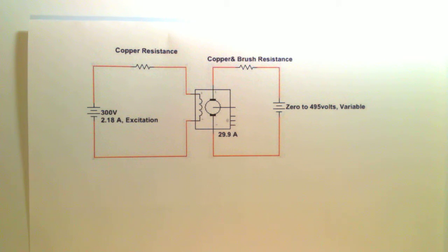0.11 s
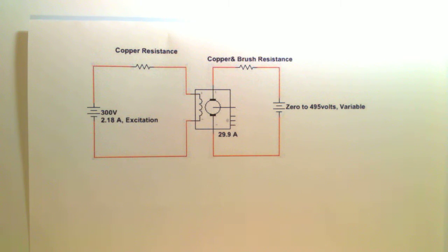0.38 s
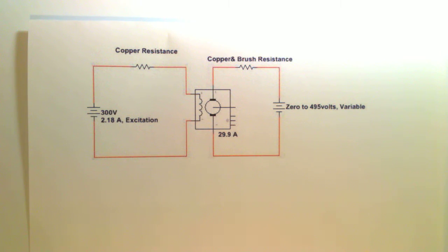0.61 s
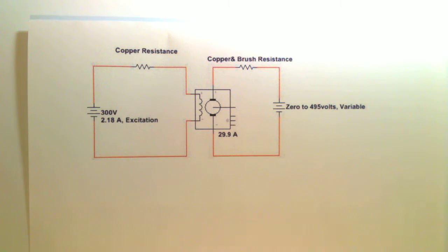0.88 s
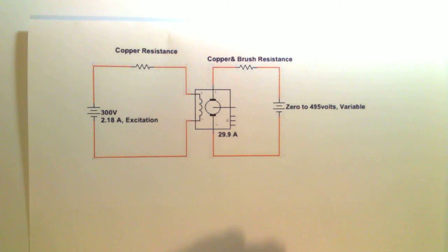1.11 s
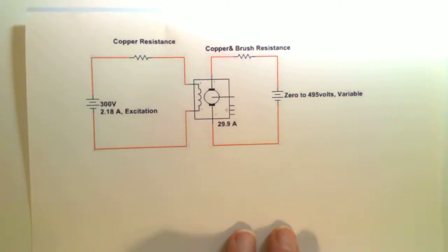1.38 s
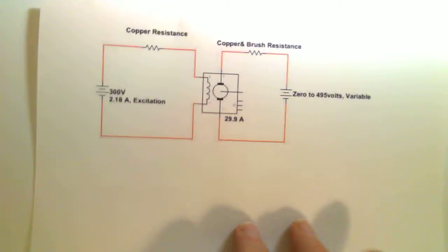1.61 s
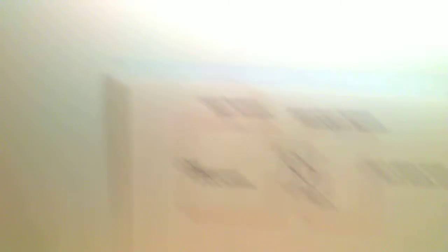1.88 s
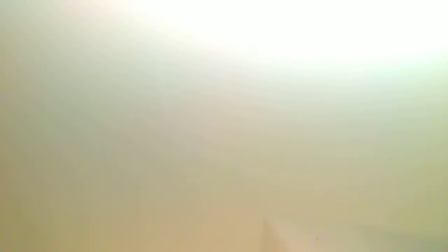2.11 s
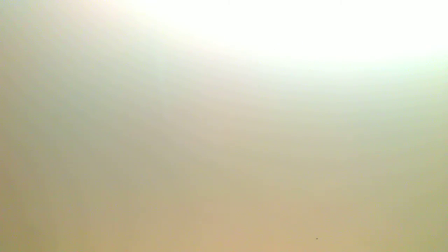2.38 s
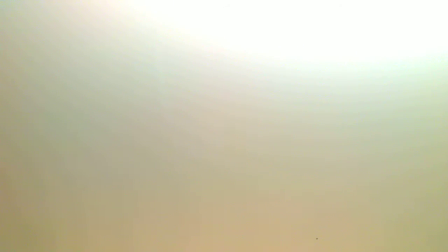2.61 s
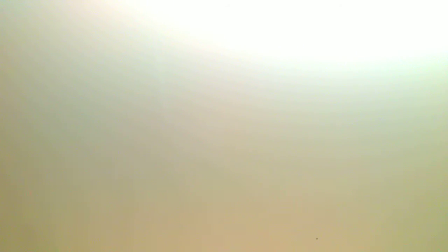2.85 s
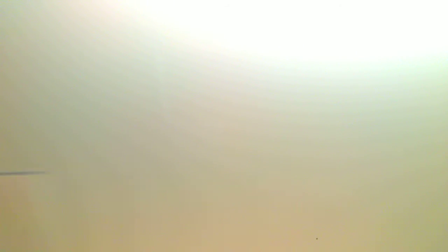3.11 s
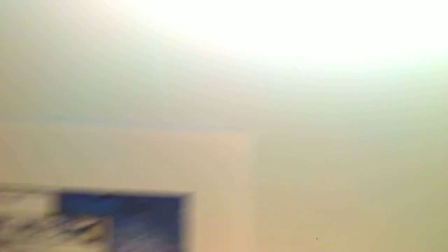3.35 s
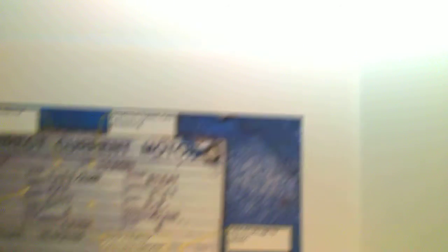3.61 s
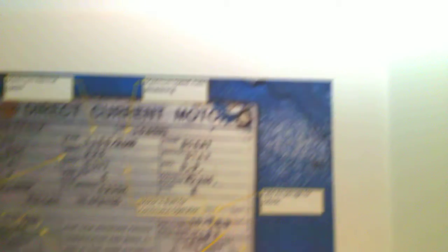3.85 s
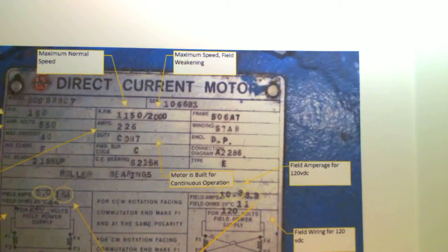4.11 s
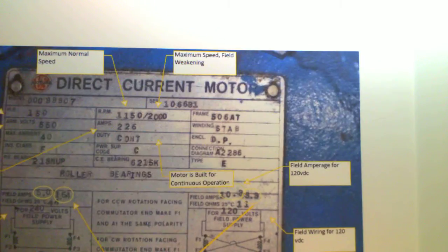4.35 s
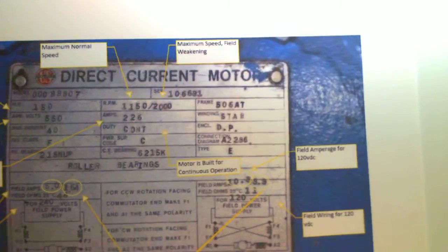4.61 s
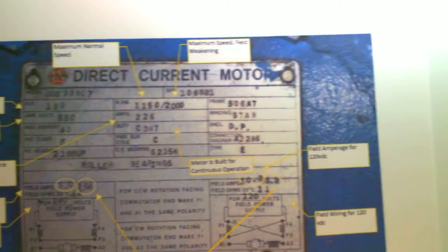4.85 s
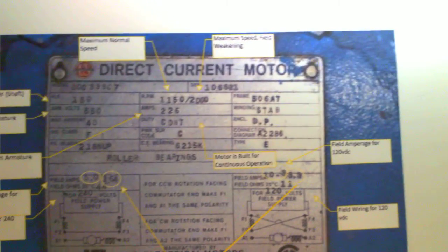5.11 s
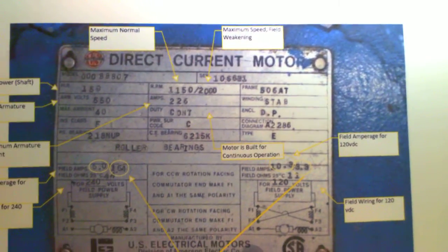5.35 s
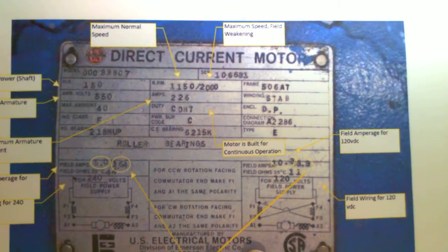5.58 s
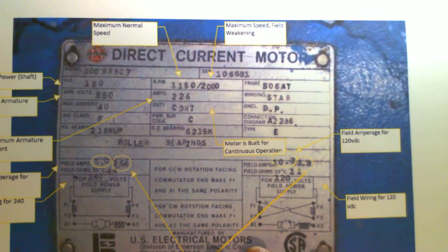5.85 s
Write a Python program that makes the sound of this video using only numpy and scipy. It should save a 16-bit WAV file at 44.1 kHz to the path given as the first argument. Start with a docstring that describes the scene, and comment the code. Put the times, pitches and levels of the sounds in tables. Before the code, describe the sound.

Papers shift faintly, one bright crack leaps out, smaller crinkles and slides follow, then only sparse ticks and dull fingertip knocks in near silence.

```python
"""Sheets of paper snap, scuff and slide on a desk in a small quiet room, heard by a close microphone.
Snaps are short bursts of coloured noise or near-single cracks; slides are gritty noise, bright and dull, in strokes.
Fingers and wrist tap the desk: short rough pushes ring its modes. The room answers each sound briefly.
Under it lie shaped noise for the microphone's hiss and a low rumble, a faint wavering hum and two mains tones."""
import sys
import numpy as np
from scipy import signal
from scipy.fft import rfft, irfft, next_fast_len
from scipy.io import wavfile
from scipy.ndimage import uniform_filter1d, map_coordinates

SR = 44100
rng = np.random.default_rng(int(sys.argv[2]) if len(sys.argv) > 2 else 0)


def digitize_waveform(pressure):
    """Quantize a signal to 16-bit integers and store it at the path in sys.argv[1].

    Rows of a 2-D input are taken as channels; values are limited to [-1, 1].
    """
    field = np.atleast_2d(pressure).T
    bounded = np.clip(field, -1, 1)
    quanta = np.round(bounded * 32767).astype(np.int16)
    wavfile.write(sys.argv[1], SR, quanta)


def magnitude_from_level(level_db):
    """Linear magnitude for a level in decibels (20 dB per decade)."""
    exponent = np.asarray(level_db, float) / 20
    return 10 ** exponent


N = 263227  # length [samples]


def unit(x):
    """Scaled to rms 1."""
    return x / np.sqrt(np.mean(x ** 2) + 1e-20)


def along(points, hz):
    """Reads (frequency [Hz], value) points on a log frequency axis."""
    f, v = np.transpose(points)
    return np.interp(np.log(hz + 1), np.log(f + 1), v)


def curves(rows):
    """One value per sample for each column after the time."""
    s, *cols = np.transpose(rows)
    return [np.interp(np.arange(N) / SR, s, c) for c in cols]


def wobble(rate):
    """A smooth random curve, rate knots a second."""
    knots = rng.standard_normal(int(N * rate / SR) + 4)
    return map_coordinates(knots, [np.arange(N) * rate / SR])


def coloured(x, gain):
    """x times a gain of frequency, brought to rms 1."""
    m = next_fast_len(len(x) + 8192)
    spectrum = rfft(x, m) * gain(np.fft.rfftfreq(m, 1 / SR))
    return unit(irfft(spectrum, m)[:len(x)])


def swell(t, rise, t60):
    """A quick rise, then an exponential fall."""
    return (1 - np.exp(-t / max(rise, 1 / SR))) * magnitude_from_level(-60 * t / max(t60, 1e-3))


# bursts of the sheet buckling or its edge striking, close to the microphone; close rows make one snap:
# (time [s], peak level [dB], centre frequency [Hz], spread [octaves], t60 [s])
SNAPS = [(1.0145, -42, 2470, 0.79, 0.0072), (1.016, -42.5, 2030, .15, 0.016),
         (1.0246, -37, 1075, .22, 0.023), (1.195, -44, 8500, 0.71, 0.027), (1.327, -53, 2500, .3, .02),
         (1.5405, -15.5, 8000, .8, 0.017), (1.543, -7.5, 7450, .6, 0.0071), (1.5435, -19, 13400, .25, .012),
         (1.546, -35.5, 800, .6, 0.066), (1.548, -15.5, 3750, 0.55, 0.023), (1.5525, -17, 7000, .72, .02),
         (1.553, -26, 13500, .25, .02), (1.563, -25, 9000, .55, .018), (1.572, -27, 2170, 0.44, 0.038),
         (1.585, -31, 1880, .2, 0.033), (1.758, -54, 1800, 0.5, .01), (1.952, -52, 930, .25, .036),
         (1.985, -40, 990, 0.64, .014), (1.993, -45, 1100, .6, 0.042), (2.121, -40, 4000, 1.3, .012),
         (2.139, -35.5, 1690, 0.48, 0.023), (2.146, -34, 1660, .26, .025), (2.286, -37, 2600, .12, .04),
         (2.293, -32, 2800, .5, .022), (2.299, -28, 5000, 0.67, .02), (2.303, -30.5, 2980, .65, 0.072),
         (2.405, -45, 1500, .6, .03), (2.416, -40.5, 1350, .4, 0.058), (2.432, -28.5, 1500, .45, 0.023),
         (2.4368, -35, 1800, 0.4, .013), (2.44, -32, 1600, .4, .008), (2.445, -36, 1770, .55, .0068),
         (2.453, -36, 10000, .4, .015), (2.5165, -37, 6000, 1.01, .017), (2.518, -34, 3230, .2, 0.032),
         (2.627, -39, 4500, 0.53, .0058), (2.793, -49, 500, 0.31, .014), (2.979, -42, 2000, .7, .024),
         (2.987, -38, 2130, 0.48, 0.02), (3.6147, -34, 850, 0.76, .0046), (3.619, -43.5, 885, 0.84, .028),
         (3.8, -52, 3700, .33, .03), (4.5499, -33.5, 2410, .89, .0044), (4.553, -50.5, 1200, .9, .03),
         (5.011, -45, 3930, 0.49, .008)]


def snaps():
    """Each row is a short coloured burst; several close rows make one big snap; the briefest are nearly one crack."""
    out, t = np.zeros(N + SR), np.arange(SR // 4) / SR
    for s, db, hz, spread, t60 in SNAPS:
        rise = .04 * t60
        band = lambda f: np.exp(-.5 * (np.log2((f + 1) / hz) / max(spread, .1)) ** 2)
        burst = coloured(rng.standard_normal(len(t)), band) * swell(t, rise, t60)
        impulse = np.arange(len(t)) == round(rise * SR + SR / hz)
        crack = coloured(impulse, band)
        clean = np.clip(1.4 - t60 / .009, 0, .9)  # share of the clean crack
        mixed = (1 - clean) * burst / np.abs(burst).max() + clean * crack / crack.max()
        out[round(s * SR):][:len(t)] += magnitude_from_level(db) * mixed / np.abs(mixed).max()
    return out[:N]


# the rub of the sheet's fine fibres, bright, as a relative spectrum: (frequency [Hz], level [dB per Hz])
BRIGHT = [(710, -42), (1200, -22), (1310, -17.5), (2430, -4.5), (2650, -3.5), (3810, -3), (6240, -3.5),
          (9470, -3.5), (10900, -4), (13200, -2.5), (15500, -3.5)]
# the rub of the sheet's body, dull, as a relative spectrum: (frequency [Hz], level [dB per Hz])
DULL = [(300, -6), (700, -1.5), (1500, -0.5), (2500, -4), (4000, -7), (7000, -16)]


def slide():
    """Fibres catch unevenly: gritty noise, a fine bright part and a coarser dull part from the sheet's body."""
    fine, coarse = strokes()
    grit = lambda rate, depth_db: rng.standard_normal(N) * magnitude_from_level(depth_db * wobble(rate))
    bright = coloured(patchy(grit(500, 1.5), depth_db=2.2), lambda hz: magnitude_from_level(along(BRIGHT, hz)))
    dull = coloured(patchy(grit(250, 1.4), depth_db=1.37), lambda hz: magnitude_from_level(along(DULL, hz)))
    # both levels flicker, each on its own
    fine_rub = fine * magnitude_from_level(.8 * wobble(30)) * bright
    coarse_rub = coarse * magnitude_from_level(1.1 * wobble(25)) * dull
    return fine_rub + coarse_rub


# the sheet is dragged over the desk in short strokes; a rise or fall of 0 or less lasts one sample:
# (time of top speed [s], fine rub level [dB], coarse rub level over the fine [dB],
#  time to gain the last 10 dB [s], time to lose the first 10 dB [s])
STROKES = [(0.0, -61.5, 1.5, .05, 0.27), (.27, -69.5, 6.5, 0, 0.4), (.4, -65, -6, -0.1, 0.6),
           (.76, -61.5, -3.5, .035, 0.2), (1.21, -64, -4, 0, -0.1), (1.445, -45.5, -14, 0, .08),
           (1.472, -40, -20.5, 0.01, .17), (1.545, -25, -10.5, 0.002, 0.0126), (1.58, -50, 5, 0.034, 0),
           (1.694, -45.5, -6, 0.0564, 0), (1.8, -60, -4, 0.25, 0.23), (1.9, -56, -19, 0.03, 0.11),
           (2.0, -65, 0.1, 0.23, 0.3), (2.124, -50, -2, .005, .05), (2.15, -59, 10.5, 0.04, .05),
           (2.175, -62.5, 11.5, 0.03, 0.06), (2.18, -53, -5, 0.03, 0.12), (2.27, -47, -8, 0.04, 0.08),
           (2.3, -39, -6, 0, 0.02), (2.34, -58, 4, .03, .1), (2.43, -68.5, 20.1, .04, .05),
           (2.455, -51, 3.5, -0.0137, 0.1029), (2.52, -45.5, 1.5, 0, 0.034), (2.58, -56, 1, 0, .15),
           (2.8, -67, 11.5, -0.05, .12), (2.95, -57.5, -3, .08, 0.08), (3.0, -74, 16, .08, 0.02),
           (3.28, -65.5, 5.5, 0.15, 0.07), (3.4, -66, -3, 0.4, 0.5), (3.63, -63.5, 3.5, 0.14, 0.08),
           (3.69, -68, 9.5, 0.03, 0.07), (3.81, -66, 1, 0, 0.17), (4.2, -65.5, 4, 0.12, 0.17),
           (4.31, -69.5, 5.5, 0.2, .13)]


def strokes():
    """Each stroke speeds up and dies away steadily in dB; the powers of overlapping strokes add."""
    rest_fine_db, rest_coarse_db = -71, -70  # the faint rustle of a held sheet between strokes
    t = np.arange(N) / SR
    fine, coarse = np.full(N, magnitude_from_level(2 * rest_fine_db)), np.full(N, magnitude_from_level(2 * rest_coarse_db))
    for s, db, coarse_db, rise, fall in STROKES:
        before = (s - t) / max(rise, 1 / SR)
        after = (t - s) / max(fall, 1 / SR)
        power = magnitude_from_level(2 * (db - 10 * np.where(t < s, before, after)))
        fine = fine + power
        coarse = coarse + power * magnitude_from_level(2 * coarse_db)
    return np.sqrt(fine), np.sqrt(coarse)


def patchy(x, depth_db):
    """The bending sheet lifts some bands for a moment and mutes others."""
    z = signal.stft(x, nperseg=256)[2]
    field = uniform_filter1d(rng.standard_normal(z.shape), size=5, axis=0)  # across frequency
    field = uniform_filter1d(field, size=14, axis=1)  # across time
    return signal.istft(z * magnitude_from_level(depth_db * unit(field)), nperseg=256)[1][:N]


# fingers and wrist knock the desk: (time [s], peak level [dB], frequency favoured at that spot [Hz])
KNOCKS = [(0.254, -43.5, 170), (.30, -45, 250), (1.019, -32.5, 189), (1.029, -42.5, 400),
          (1.053, -42.5, 250), (1.204, -46.5, 221), (1.492, -49, 125), (1.545, -37.5, 200),
          (1.754, -40, 310), (1.985, -46.5, 310), (2.155, -46, 330), (2.414, -39.5, 200), (2.45, -43, 330),
          (2.789, -50.5, 400), (2.984, -43, 390), (3.622, -48, 280), (4.563, -40.5, 316), (4.573, -41, 150),
          (4.6, -49.5, 150)]
# the modes of the desk top: (frequency [Hz], relative level [dB], t60 [s])
DESK = [(125, -4, 0.23), (174.3, 1.5, .12), (200, -3, 0.16), (231, -3.5, 0.18), (280, -4, 0.15),
        (323.2, 4.5, 0.15), (390, -2.5, 0.22), (463, -22, 0.3), (990, -20.5, 0.24), (1210, -45.5, 0.088)]


def knocks():
    """A soft fingertip lands as a short rough push into the desk modes; each spot on the desk favours its own."""
    contact_s = .0035  # sets how long a fingertip presses
    spot_db_per_octave = 11.5  # how fast modes fall off away from the favoured frequency
    out, t = np.zeros(N + SR), np.arange(SR // 2) / SR
    for s, db, spot_hz in KNOCKS:
        push = (0.35 + rng.standard_normal(SR // 10)) * swell(t[:SR // 10], contact_s / 4, 8 * contact_s)
        desk = np.zeros(len(t))
        for hz, level, t60 in DESK:
            mode_db = level - spot_db_per_octave * abs(np.log2(hz / spot_hz))
            desk += magnitude_from_level(mode_db - 60 * t / t60) * np.cos(2 * np.pi * hz * t)
        ring = signal.fftconvolve(push, desk)[:len(t)]
        out[round(s * SR):][:len(t)] += magnitude_from_level(db) * ring / np.abs(ring).max()
    return out[:N]


# how long the small room rings: (frequency [Hz], t60 [s])
ROOM = [(200, 0.35), (800, 0.25), (2000, 0.2), (5500, 0.23), (14000, 0.19)]


def room(x):
    """The answer is diffuse noise, drawn anew every eighth of a second; each frequency dies at its own speed."""
    out, hop = np.zeros(N + 2 * SR), SR // 8
    for start in range(0, N, hop):
        hz, t, z = signal.stft(rng.standard_normal(SR // 2), SR, nperseg=256)
        decay = magnitude_from_level(-60 * t / along(ROOM, hz)[:, None])
        tail = signal.istft(z * decay, SR, nperseg=256)[1]
        wet = signal.fftconvolve(x[start:start + hop], tail / np.linalg.norm(tail))
        out[start + 130:][:len(wet)] += wet  # the path by the nearest wall is a metre longer
    return out[:N]


# rumble and microphone hiss, as a relative spectrum: (frequency [Hz], level [dB per Hz])
FLOOR = [(3, 1.5), (16, -5.5), (32, -15.5), (70, -16.5), (170, -22), (400, -28.5), (800, -30),
         (1400, -36.5), (3000, -41.5), (7000, -41.5), (14000, -41), (16000, -53.5)]
# wavering hum: (time [s], level [dB rms])
HUM = [(0, -75), (.25, -67.5), (.4, -57.5), (.55, -71.5), (1.2, -67.5), (2.4, -69.5), (3.0, -74),
       (4.0, -76.5), (4.7, -65), (5.2, -72), (5.4, -61), (5.8, -64.5), (5.97, -58)]
# steady mains tones: (frequency [Hz], level [dB rms])
MAINS = [(120, -79.5), (240, -78)]


def background():
    """Rumble and hiss are shaped noise, the wavering hum is a narrow band of noise, the mains tones are sines."""
    floor = magnitude_from_level(-53.5) * coloured(rng.standard_normal(N), lambda hz: magnitude_from_level(along(FLOOR, hz)))
    narrow = coloured(rng.standard_normal(N), lambda hz: 1 / (1 + ((hz - 109) / 4) ** 2))
    hum = magnitude_from_level(curves(HUM)[0]) * narrow
    t = np.arange(N) / SR
    tones = sum(np.sqrt(2) * magnitude_from_level(db) * np.sin(2 * np.pi * hz * t) for hz, db in MAINS)
    return floor + hum + tones


def scene():
    """Paper and desk close to the microphone, the room's answer 6 dB down, over the background."""
    near = snaps() + slide() + knocks()
    mono = near + magnitude_from_level(-6) * room(near) + background()
    return np.array([mono, mono])


def top_cut(x):
    """Nothing passes above the cut-off."""
    return signal.sosfilt(signal.butter(12, 16460, fs=SR, output="sos"), x)


# faint shaped noise, opposite in left and right, as a relative spectrum: (frequency [Hz], level [dB per Hz])
OPPOSITE = [(20, -5), (100, -19), (500, -17.5), (2000, -30), (6000, -25), (11000, -23.5), (15000, -23.5)]


def record(dry):
    """The mono scene gets a trace of opposite noise in each channel; a steep low-pass limits the band."""
    opposite = magnitude_from_level(-81.5) * coloured(rng.standard_normal(N), lambda hz: magnitude_from_level(along(OPPOSITE, hz)))
    top_hz = 15650
    low_pass = signal.ellip(8, .3, 50, top_hz, fs=SR, output="sos")
    pair = signal.sosfilt(low_pass, dry + [opposite, -opposite])
    return top_cut(pair)


dry = scene()
out = record(dry)
digitize_waveform(out)
```